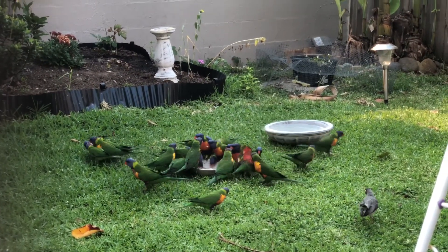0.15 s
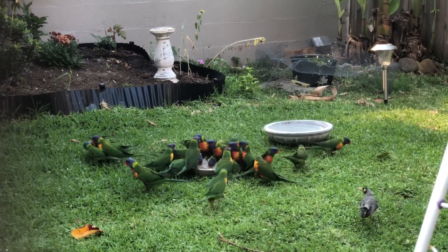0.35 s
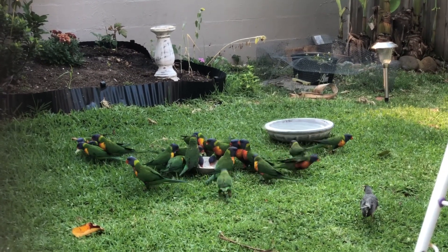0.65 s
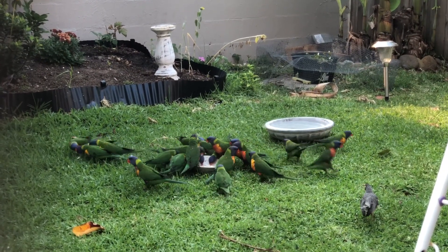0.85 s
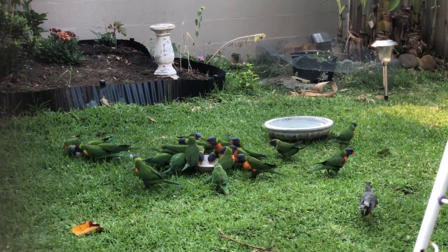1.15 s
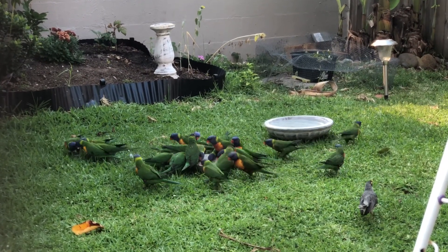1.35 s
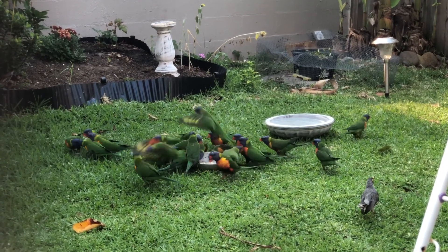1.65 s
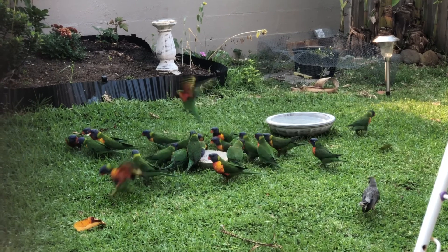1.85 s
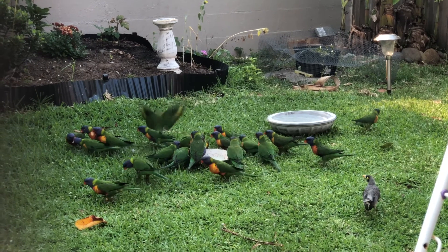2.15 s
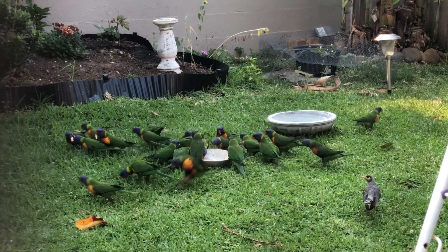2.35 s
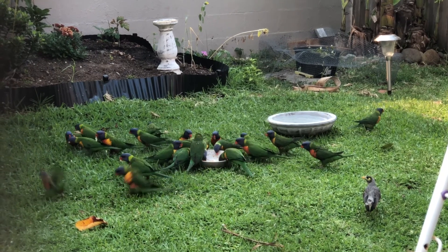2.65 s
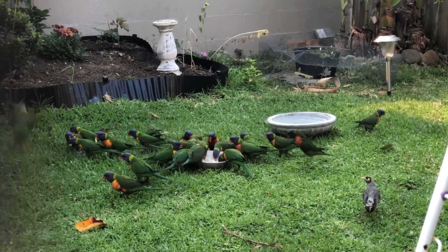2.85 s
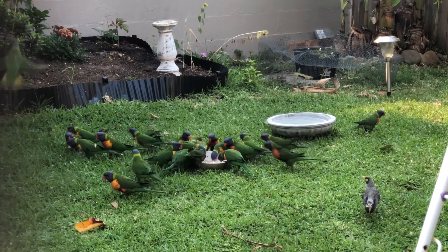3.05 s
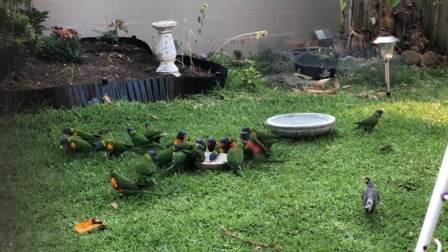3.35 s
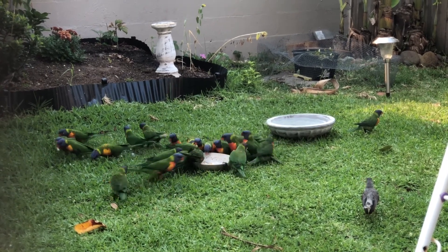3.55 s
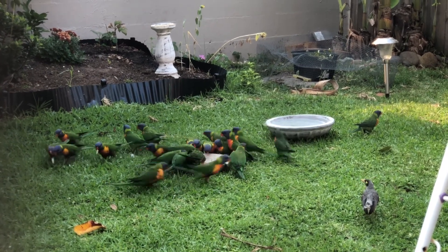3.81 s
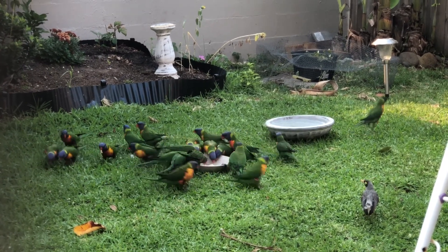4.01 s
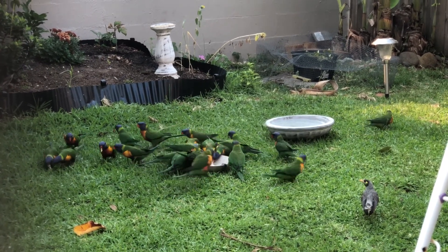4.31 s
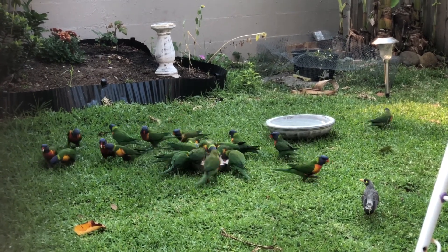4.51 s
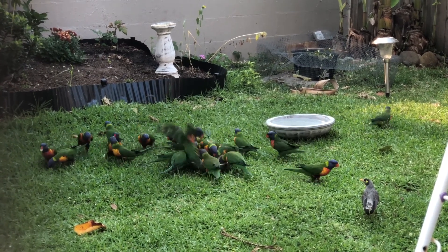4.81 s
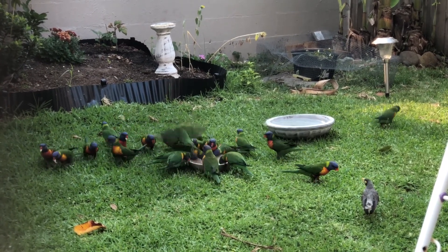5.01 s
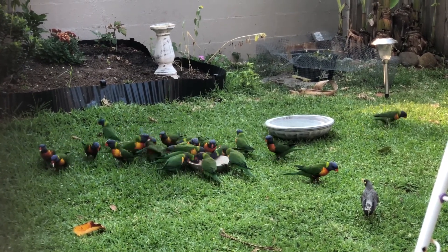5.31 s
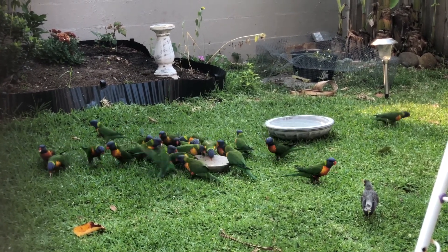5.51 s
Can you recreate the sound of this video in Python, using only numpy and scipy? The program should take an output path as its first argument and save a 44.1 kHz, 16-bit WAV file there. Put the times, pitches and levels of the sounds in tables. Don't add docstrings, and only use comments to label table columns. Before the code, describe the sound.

Raspy parrot screeches, sharp squeaks and a clear piping whistle come in bursts above a low engine hum and distant bird murmur.

```python
import sys
import numpy as np
from scipy import signal
from scipy.io import wavfile
from scipy.ndimage import uniform_filter1d

SR = 44100
rng = np.random.default_rng(int(sys.argv[2]) if len(sys.argv) > 2 else 0)


def to_wav(sig):
    pcm = np.clip(np.atleast_2d(sig), -1, 1) * 32767
    pcm = np.round(pcm).astype(np.int16)
    wavfile.write(sys.argv[1], SR, pcm.T)


def nominal_scale(level):
    x = np.asarray(level, float) / 20
    return 10 ** x


N = 250047


def evened(x):
    return x / np.sqrt(np.mean(x ** 2) + 1e-20)


def read(points, hz):
    f, value = np.transpose(points)
    return np.interp(np.log(hz + 1), np.log(f + 1), value)


def columns(rows, t):
    s, *cols = np.transpose(rows)
    return [np.interp(t, s, c) for c in cols]


def add(mix, s, sound):
    at = round(s * SR)
    sound = sound[max(-at, 0):]
    part = mix[max(at, 0):][:len(sound)]
    part += sound[:len(part)]


def wander(size, hz):
    pad = 4000
    b, a = signal.butter(2, min(hz, 9000), fs=SR)
    return evened(signal.lfilter(b, a, rng.standard_normal(size + pad))[pad:])


def resonate(x, hz, width_hz):
    turn = np.exp(2j * np.pi * np.cumsum(hz * np.ones(len(x))) / SR)
    r = np.exp(-np.pi * width_hz / SR)
    return 2 * (turn * signal.lfilter([1 - r], [1, -r], x / turn)).real


def traffic():
    # f/Hz, level/dB per Hz
    wash_spectrum = [(18, -35), (30, 11.5), (64, -5), (203, 0.5), (351, -6.5), (519, -9.5), (608, -7),
                     (973, -11.5), (1370, -10.5), (1870, -20.5), (2770, -19), (3790, -23), (5190, -21),
                     (10800, -36.5), (15600, -45)]
    # t/s, level/dB
    wash_level = [(0, -38.5), (2.7, -39.5), (5.67, -40.5)]
    # t/s, f/Hz, level/dB
    hum = [(0, 67.3, -38), (.35, 69, -40), (.93, 75, -35.5), (1.1, 73.54, -41), (2.64, 66.7, -37.5),
           (3.47, 67.8, -44), (4.15, 72, -51.5), (4.86, 69.8, -40), (5.67, 74.6, -46.5)]
    # multiple of the low line, level/dB
    hum_upper = [(1.68, -2.5), (2.4, -16), (3.15, -6.5), (4.6, -12.5)]
    t, hz = np.arange(N) / SR, np.fft.rfftfreq(2048, 1 / SR)
    a, b, patches = rng.standard_normal((N // 512 + 5, 1025, 3)).T
    patches = evened(uniform_filter1d(uniform_filter1d(patches, 14, 0), 8, 1))
    z = (a + 1j * b) * nominal_scale(read(wash_spectrum, hz)[:, None] + 0.61 * patches)
    wash = evened(signal.istft(z, nperseg=2048, noverlap=1536)[1][:N])
    hum_hz, low_db = columns(hum, t)
    low = nominal_scale(low_db) * evened(resonate(rng.standard_normal(N), hum_hz, 6.3))
    upper_db = np.maximum(-38.5 - 5 * np.maximum(t - 1, 0), -50)
    slow_hz = uniform_filter1d(hum_hz, SR)
    upper = 0
    for k, db in hum_upper:
        line = evened(resonate(rng.standard_normal(N), k * slow_hz, 4.8))
        upper = upper + nominal_scale(upper_db + db) * line
    return nominal_scale(columns(wash_level, t)[0] + 0.5) * wash + low + upper


def murmur():
    # t/s, level/dB
    murmur_level = [(0, -37), (.7, -51), (1.85, -39.5), (2.2, -64.5), (3.6, -58.5), (4.25, -46.5),
                    (4.7, -52), (5.67, -34.5)]
    voices = 0
    for hz in np.geomspace(2300, 6600, 9):
        hz = hz * (1 + 0.11 * wander(N, 1.8))
        voice = resonate(resonate(rng.standard_normal(N), hz, 360), hz, 1000)
        voices = voices + voice * nominal_scale(3.8 * wander(N, 7))
    return nominal_scale(columns(murmur_level, np.arange(N) / SR)[0]) * evened(voices)


def call(length_s, effort_db, top_hz, swell_db, attack_db, start_share, sag_hz_per_s,
         breath_early, breath_late, treble_db, treble_gain, lack_db):
    attack_s, release_s, release_db = .026, 0.051, -19.5
    shut_pipe, open_pipe = 0.893, 1.01
    t = np.arange(0, length_s, 1 / SR)
    closed = np.clip(1 - t / attack_s, 0, 1)
    closing = np.clip(1 - (length_s - t) / release_s, 0, 1)
    hold = np.clip((t - attack_s) / max(length_s - attack_s - release_s, .01), 0, 1)
    level_db = effort_db + attack_db * closed + swell_db * hold + release_db * closing
    hz = top_hz * (1 - max(1 - start_share, 0) * closed)
    hz = hz - sag_hz_per_s * np.maximum(t - attack_s, 0)
    breath = breath_early + (breath_late - breath_early) * t / length_s
    treble_db = treble_db + treble_gain * (level_db + 16) + lack_db * (1 - hold)
    pipe = open_pipe - (open_pipe - shut_pipe) * np.maximum(closed, closing ** 2)
    return level_db, hz, breath, treble_db, pipe * hz / top_hz


def screech(effort_db, hz, breath, treble_db, pipe, partials_db, flutter, chest_db, chest_shift):
    # f/Hz, width/Hz, level/dB
    pipe_bands = [(1200, 500, -17), (2000, 800, -16), (2620, 360, -3), (3950, 380, -2), (5300, 480, -1.5),
                  (6600, 800, -7), (8500, 2000, -8), (12000, 4000, -12)]
    size, breath = len(hz), np.clip(breath, 0, 1)
    breath = breath * np.clip(.35 + np.arange(size) / (.04 * SR), 0, 1)
    turns = np.cumsum(hz * (1 + .01 * wander(size, 60))) / SR
    voiced, airy = np.zeros((2, size))
    for k, db in enumerate(partials_db):
        shake = 1 + flutter * (wander(size, 90) + 1j * wander(size, 90))
        smear = (1.3 + .45 * k * breath) * shake.imag
        lift_db = treble_db * np.log2(max(k + 1, 2) / 3)
        partial = evened(shake.real) * np.cos(2 * np.pi * (k + 1) * turns + smear)
        voiced += nominal_scale(db + lift_db) * partial
    puffs = (.5 + np.exp(-(turns % 1) / 0.65)) * rng.standard_normal(size)
    for k, (f, width_hz, db) in enumerate(pipe_bands):
        chest = k == 2
        lift_db = treble_db * np.log2(np.clip(f, 2000, 9000) / 4000) + chest_db * chest
        f = f * chest_shift ** chest
        ring = evened(resonate(resonate(puffs, f * pipe, width_hz), f * pipe, 1.7 * width_hz))
        patches_db = 2.75 * wander(size, 31.5)
        airy += (-1) ** k * nominal_scale(db + lift_db + patches_db) * ring
    voiced, airy = [x / np.sqrt(uniform_filter1d(x ** 2, 2000) + 1e-9) for x in (voiced, airy)]
    out = np.sqrt(1 - breath) * voiced + np.sqrt(breath) * airy
    return nominal_scale(effort_db) * out * signal.windows.tukey(size, .07)


def near_screeches(birds):
    # t/s, length/s, effort/dB, top pitch f/Hz, swell over the hold/dB
    hoarse = [
        (-.03, .13, -10, 1064, 0),
        (.188, 0.14, -7.5, 1001, 1),
    ]
    clear = [
        (.414, .146, -15, 1030, 6),
        (1.35, .15, -9.5, 1062, -1.5),
        (1.963, .15, -12.5, 1046, 1),
    ]
    dull = [
        (4.862, 0.089, -14.5, 1072, -2),
        (5.02, 0.14, -17.5, 1126, 2.5),
        (5.12, 0.11, -19.5, 1146, -7.5),
        (5.572, 0.128, -14.5, 802, 2),
    ]
    near_partials = [-12, -11, -9, 0, -8, -13, -12, -12, -14, -17]
    hoarse_voice = dict(attack_db=-8.5, start_share=.92, sag_hz_per_s=749, breath_early=0.65,
                        breath_late=0.8, treble_db=1, treble_gain=0.07, lack_db=-0.3)
    clear_voice = dict(attack_db=-5, start_share=0.84, sag_hz_per_s=703, breath_early=0.15,
                       breath_late=1.07, treble_db=3, treble_gain=-0.08, lack_db=-0.4)
    dull_voice = dict(attack_db=-11, start_share=1.1, sag_hz_per_s=250, breath_early=0.75,
                      breath_late=1, treble_db=-1, treble_gain=0.73, lack_db=0.3)
    for rows, voice, chest_db, chest_shift in ((hoarse, hoarse_voice, -2, 1),
                                               (clear, clear_voice, -.5, 1.09),
                                               (dull, dull_voice, .1, 1.08)):
        for s, *shape in rows:
            controls = call(*shape, **voice)
            add(birds, s, screech(*controls, near_partials, .25, chest_db, chest_shift))


def chirp(length_s, from_hz, to_hz, second_db, first_db, opener=False):
    chirp_upper = [-14, -22, -29, -31, -31]
    u = np.linspace(0, 1, round(length_s * SR))
    hz = from_hz + (to_hz - from_hz) * (u ** 2 if opener else np.sin(np.pi * u / 2))
    turns = np.cumsum(hz * (1 + .012 * wander(len(u), 120))) / SR
    dbs = [first_db, second_db] + [second_db + d - 5 * opener for d in chirp_upper]
    tone = 0
    for k, db in enumerate(dbs, 1):
        tone = tone + nominal_scale(db + 3.5) * np.sin(2 * np.pi * k * turns) * (k * hz < 15500)
    pulse_db = min(40 * length_s, 3.5) * wander(len(u), 71) + 2.8 * wander(len(u), 310)
    return tone * nominal_scale(pulse_db) * signal.windows.tukey(len(u), .22)


def chirps(birds):
    # t/s, length/s, from f/Hz, to f/Hz, strongest partial level/dB
    peeps = [(.607, 0.12, 623, 634, -44), (1.57, .12, 1908, 1943, -35), (1.759, 0.057, 1750, 1824, -36.5),
             (1.83, 0.011, 5020, 3080, -29.5), (1.85, 0.046, 2053, 2224, -30.5),
             (1.854, 0.0093, 3000, 4600, -34), (1.866, 0.026, 4650, 4000, -39),
             (1.812, .012, 6460, 3930, -42), (1.84, .01, 5000, 2600, -36), (1.757, 0.011, 2150, 2230, -33),
             (.141, 0.021, 1240, 1420, -36), (2.52, 0.03, 1570, 1570, -40),
             (2.583, 0.104, 2630, 2520, -46.5), (3.65, 0.066, 3870, 3770, -52),
             (3.71, 0.094, 3410, 3610, -46), (4.64, .04, 3290, 3200, -44), (4.67, 0.036, 2230, 1768, -34.5),
             (5.263, 0.045, 2190, 1905, -33.5), (5.385, .07, 2334, 2430, -40),
             (5.58, 0.029, 1550, 1490, -33.5), (5.19, .05, 2200, 1500, -40)]
    cheeps = [(1.815, 0.02, 3610, 2710, -43), (1.822, 0.0216, 2594, 2500, -24),
              (1.85, .04, 2480, 2560, -40), (2.6, 0.11, 883, 845, -52), (3.848, .052, 2690, 3280, -50),
              (4.326, .05, 2270, 2260, -44), (4.634, 0.051, 2234, 2253, -37.5),
              (4.858, 0.066, 1870, 1735, -37.5)]
    twitter = [(2.45, .093, 2540, 3130, -47.5), (.806, .099, 2050, 2490, -45), (.817, .11, 1650, 1890, -55),
               (.852, 0.075, 2800, 2900, -51), (.917, .056, 3000, 3500, -43),
               (2.335, .069, 2350, 2470, -56), (2.385, .087, 2100, 1950, -52.5),
               (2.798, .031, 3600, 3250, -53.5), (2.839, .052, 3450, 3100, -51),
               (2.845, 0.049, 2700, 2450, -49.5), (2.883, 0.042, 2330, 2350, -48.5),
               (3.035, 0.043, 2850, 2920, -56), (3.174, 0.091, 2030, 2010, -58),
               (3.2, .05, 1820, 1840, -58), (3.226, 0.099, 3000, 3050, -53),
               (3.252, 0.07, 2600, 2470, -44.5), (3.745, 0.039, 2400, 2270, -47),
               (4.027, 0.042, 3800, 3230, -52), (4.065, .028, 3000, 3370, -56),
               (4.084, .09, 2600, 3250, -41)]
    openers = [
        (.176, .019, 2180, 3150, -20.5),
        (.388, 0.013, 1870, 2090, -27),
        (.398, 0.0185, 2150, 2700, -18),
        (1.338, .019, 2340, 3110, -10),
        (1.943, .0091, 1770, 1880, -26.5),
        (1.951, 0.021, 2430, 3280, -20),
    ]
    for rows, second_db, first_db, opener in ((peeps, -15, 0, False), (cheeps, -1.5, 0, False),
                                              (twitter, 0, -14, False), (openers, 0, -9, True)):
        for s, *shape, db in rows:
            add(birds, s, chirp(*shape, db + second_db, db + first_db, opener))


def following_screeches(birds):
    # t/s, length/s, effort/dB, top pitch f/Hz, swell over the hold/dB
    rasps = [
        (1.025, 0.18, -17.5, 1380, 5.5),
        (1.47, 0.17, -20, 1294, -3.5),
        (2.645, 0.15, -38, 1280, -3.5),
        (3.31, 0.1, -27, 1155, 0),
        (3.39, .17, -24.5, 1206, -2.5),
    ]
    others = [(.97, 0.14, -29, 1170, 3.5), (1.21, 0.17, -28, 1286, 4), (1.59, 0.14, -21, 1309, 0),
              (4.261, 0.2, -40, 1063, 3), (4.8, 0.097, -28.5, 1134, 4), (5.265, 0.084, -42, 1050, 4),
              (5.44, 0.2, -27, 1196, 1)]
    squawks = [
        (4.39, 0.14, -26.5, 1260, 8),
        (4.7, 0.12, -23, 1180, -0.5),
        (4.948, 0.16, -21.5, 1249, 1),
        (5.305, 0.12, -24, 1160, 3),
    ]
    other_partials = [-8, 0, -2.5, -4, -9, -14, -15, -17, -20, -22]
    rasp_voice = dict(attack_db=-8, start_share=.95, sag_hz_per_s=46, breath_early=1.1,
                      breath_late=1.2, treble_db=-0.7, treble_gain=0.45, lack_db=-.1)
    other_voice = dict(attack_db=-6, start_share=1.24, sag_hz_per_s=156, breath_early=0.9,
                       breath_late=1.2, treble_db=1, treble_gain=0.61, lack_db=0)
    squawk_voice = dict(attack_db=-4.5, start_share=0.85, sag_hz_per_s=37, breath_early=0.44,
                        breath_late=1.07, treble_db=3, treble_gain=0.24, lack_db=-5)
    for rows, voice, chest_db in ((rasps, rasp_voice, -4), (others, other_voice, 1.3),
                                  (squawks, squawk_voice, 2.5)):
        for s, *shape in rows:
            *controls, _ = call(*shape, **voice)
            pipe = controls[1] / 1325
            add(birds, s, screech(*controls, pipe, other_partials, .4, chest_db, 1))


def whistle(length_s, from_hz, to_hz, first_db, fade_db_per_s, upper_db):
    t = np.arange(0, length_s, 1 / SR)
    hz = from_hz + (to_hz - from_hz) * (t / length_s) ** 1.5
    turns = np.cumsum(hz * (1 + 0.0082 * wander(len(hz), 110))) / SR
    tone = 0
    for k, db in enumerate([0, *upper_db], 1):
        tone = tone + nominal_scale(db + 5.0) * np.sin(2 * np.pi * k * turns) * (k * hz < 16500)
    level_db = first_db + fade_db_per_s * t + 2.2 * wander(len(hz), 45)
    return tone * nominal_scale(level_db) * signal.windows.tukey(len(hz), .25)


def long_whistle(birds):
    # t/s, length/s, from f/Hz, to f/Hz, level/dB
    whistle_notes = [
        (3.287, .07, 2516, 2520, -22.5),
        (3.357, 0.0536, 2478, 2566, -20.5),
        (3.408, 0.038, 2704, 2830, -25.5),
        (3.44, 0.136, 2838, 2720, -13),
        (3.555, 0.16, 2580, 2520, -14.5),
    ]
    whistle_fades = [-330, -34, -30, -130, -270]
    # partials 2 to 6, level/dB re the first
    whistle_upper = [(-9.5, -14.5, -20, -32, -30), (-4, -16, -34, -23, -24), (-22, -35, -40, -40, -40),
                     (-15.5, -21.5, -19, -38, -45), (-32.5, -16.5, -30, -30, -30)]
    for (s, *shape), fade, upper_db in zip(whistle_notes, whistle_fades, whistle_upper):
        add(birds, s, whistle(*shape, fade, upper_db))


def rustles(birds):
    # t/s, length/s, level/dB
    wing_flicks = [
        (3.94, 0.037, -42),
    ]
    for s, length_s, db in wing_flicks:
        hiss = resonate(rng.standard_normal(round(length_s * SR)), 6800, 6000)
        add(birds, s, nominal_scale(db) * evened(hiss) * np.hanning(len(hiss)))


def walls(x):
    # f/Hz, t60/s
    wall_decay = [(800, 0.18), (3000, 0.3), (6000, 0.3), (12000, 0.22)]
    taps = np.zeros(SR // 2)
    at = np.arange(300, SR // 2 - 20, 20)
    taps[at + rng.integers(0, 20, len(at))] = rng.choice([-1., 1.], len(at))
    hz, t, z = signal.stft(taps, SR, nperseg=256)
    decay = nominal_scale(-60 * t / read(wall_decay, hz)[:, None])
    tail = signal.istft(z * decay, SR, nperseg=256)[1]
    return signal.fftconvolve(x, tail / np.linalg.norm(tail))[:N]


def scene():
    birds = np.zeros(N)
    near_screeches(birds)
    chirps(birds)
    following_screeches(birds)
    long_whistle(birds)
    rustles(birds)
    return (nominal_scale(-3.0) * birds + nominal_scale(-7.5) * walls(birds) + traffic() + murmur())[None]


def band_limit(x):
    return signal.sosfilt(signal.butter(12, 15730, fs=SR, output="sos"), x)


def record(dry):
    thinned = signal.sosfilt(signal.butter(8, 40, "high", fs=SR, output="sos"), dry[0])
    top = resonate(resonate(thinned, 13700, 1660), 18000, 2200)
    coloured = thinned + nominal_scale(12.5) * top
    return band_limit(np.clip(coloured, -1, 1)[None])


dry = scene()
out = record(dry)
to_wav(out)
```